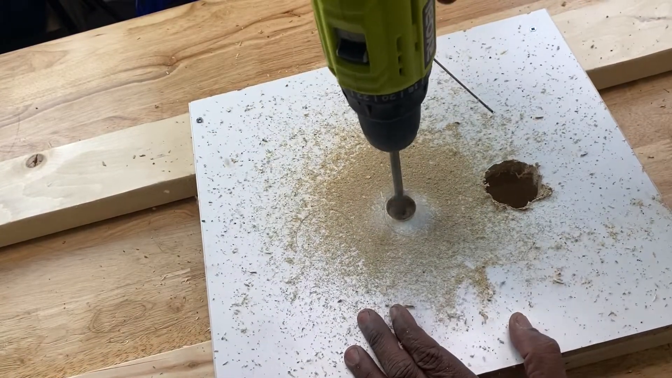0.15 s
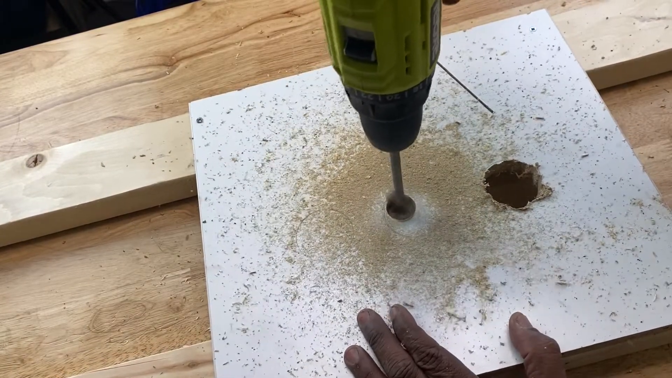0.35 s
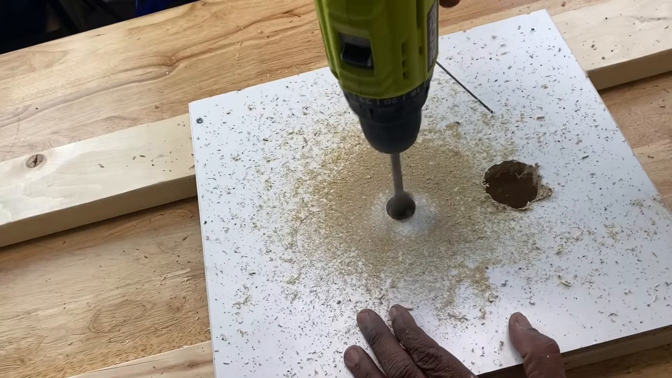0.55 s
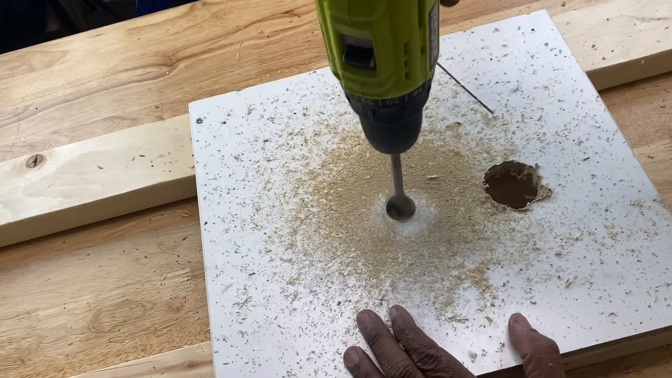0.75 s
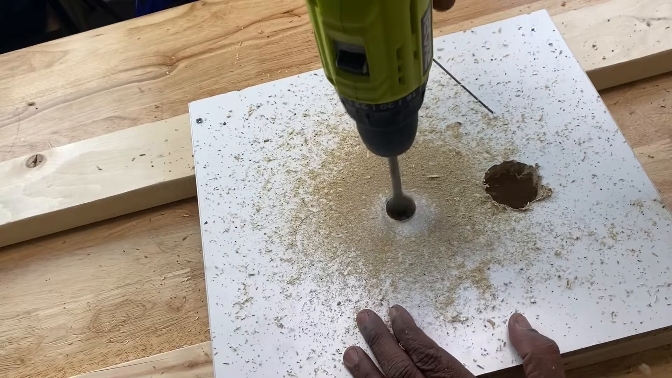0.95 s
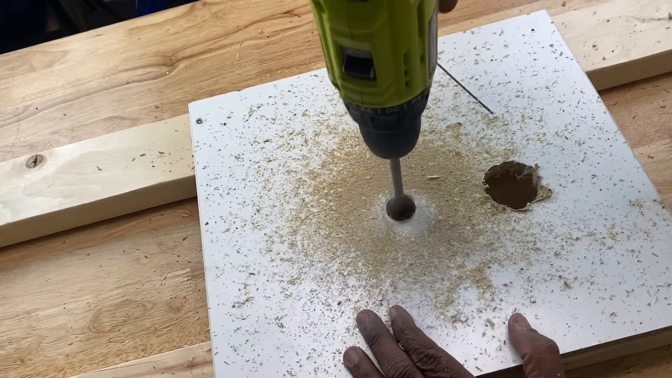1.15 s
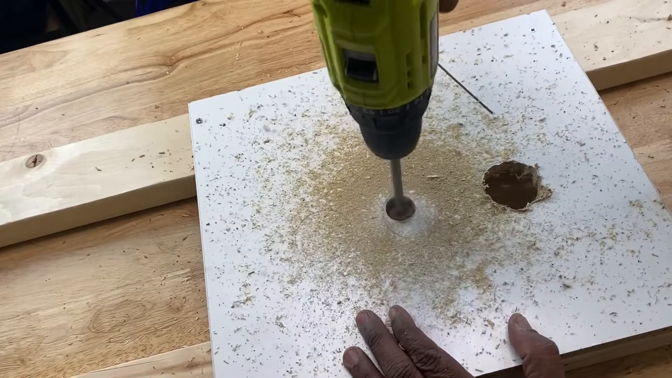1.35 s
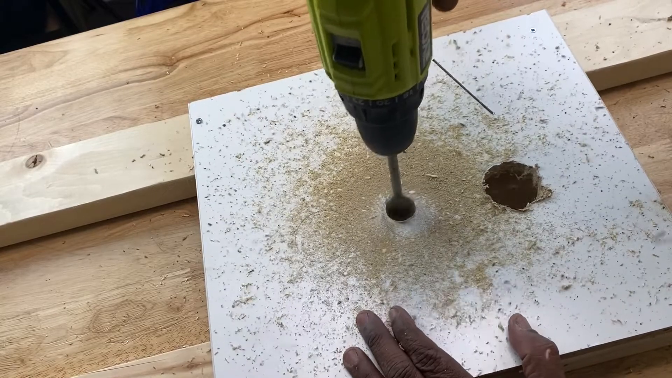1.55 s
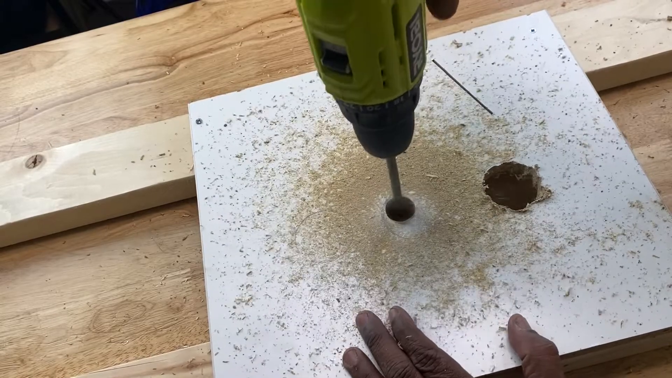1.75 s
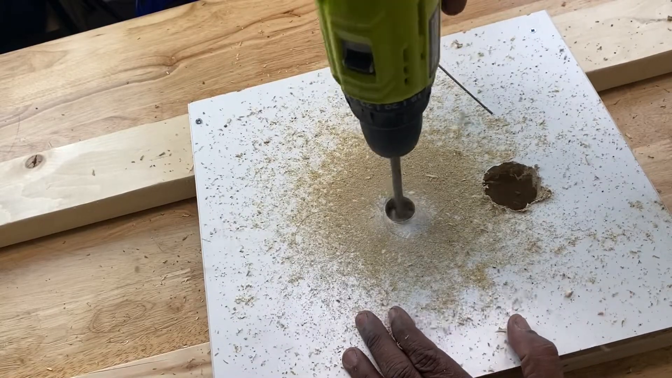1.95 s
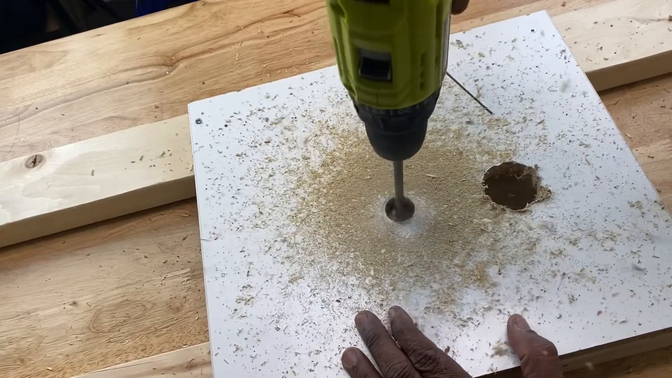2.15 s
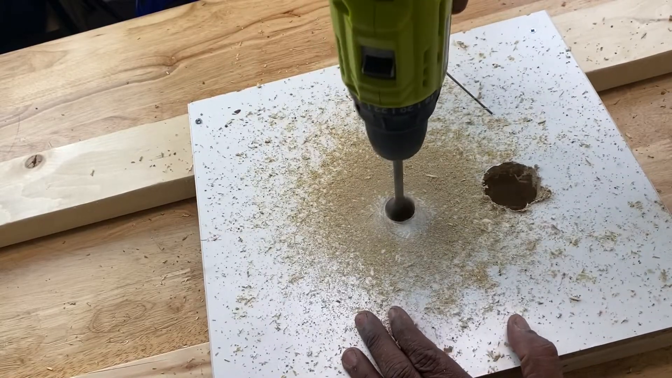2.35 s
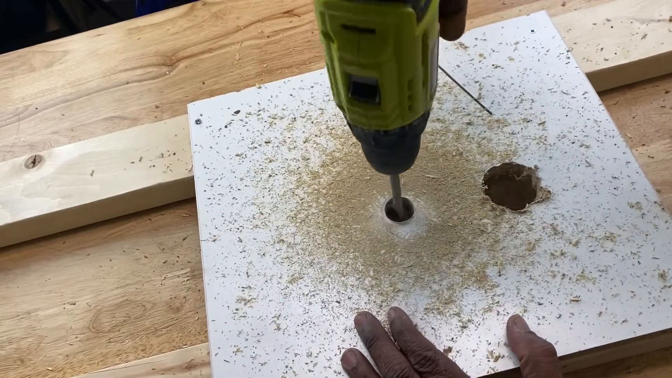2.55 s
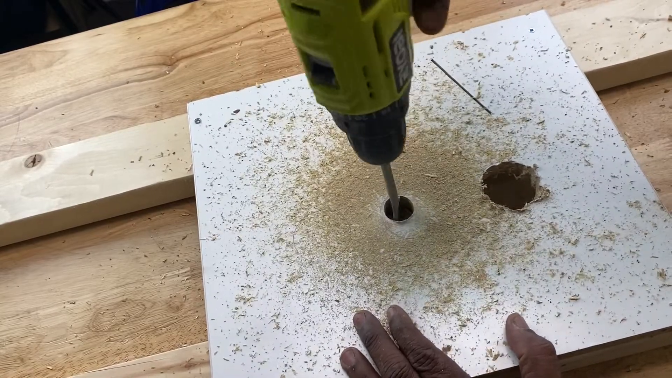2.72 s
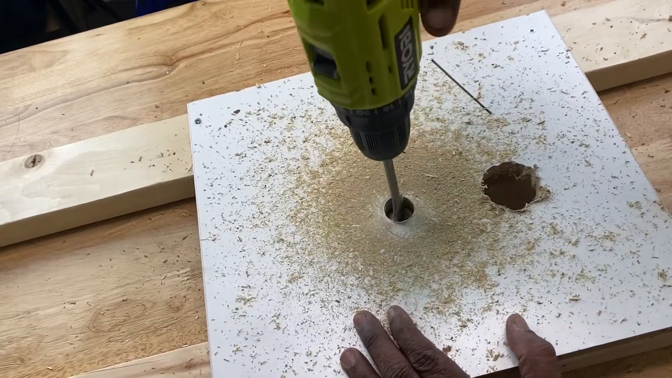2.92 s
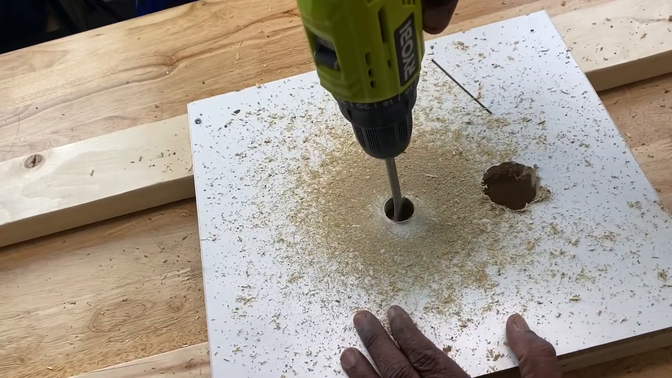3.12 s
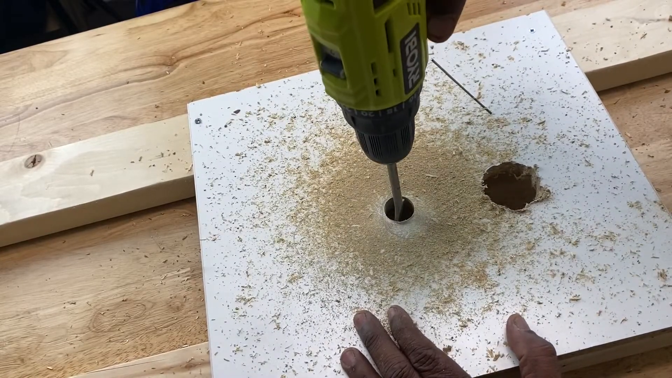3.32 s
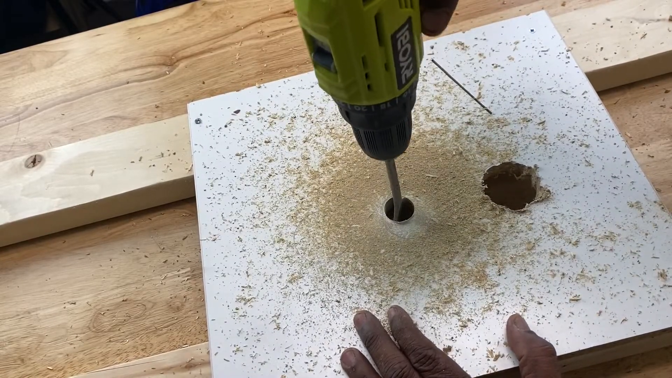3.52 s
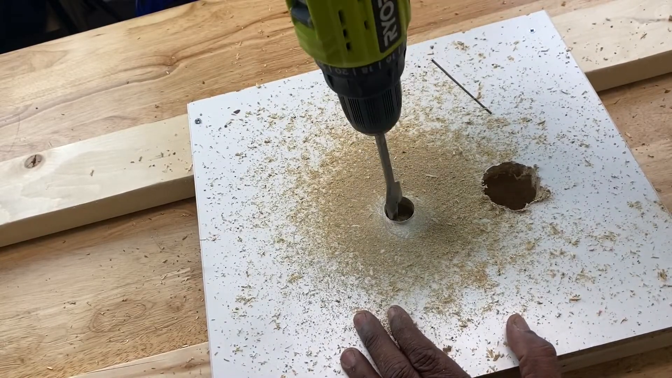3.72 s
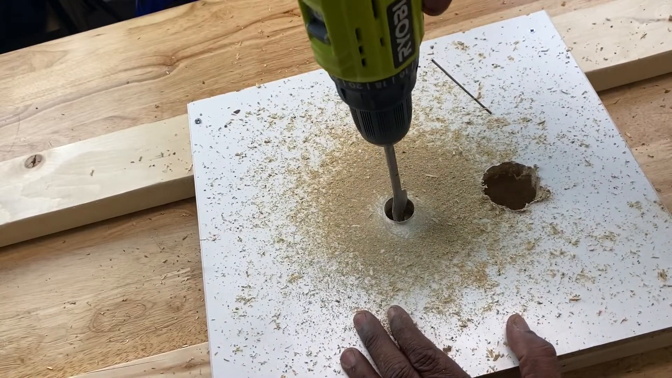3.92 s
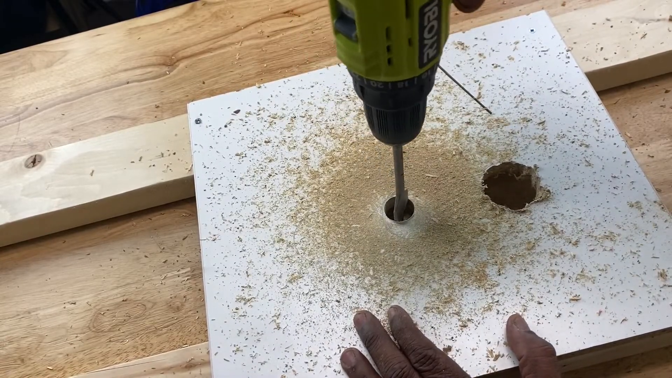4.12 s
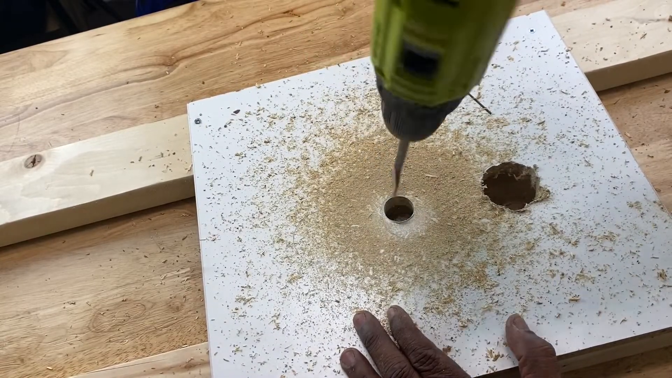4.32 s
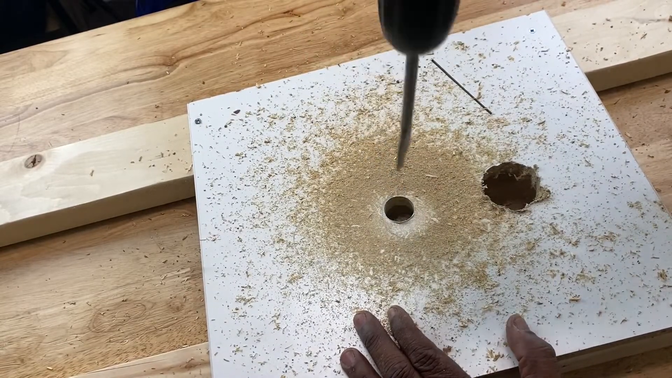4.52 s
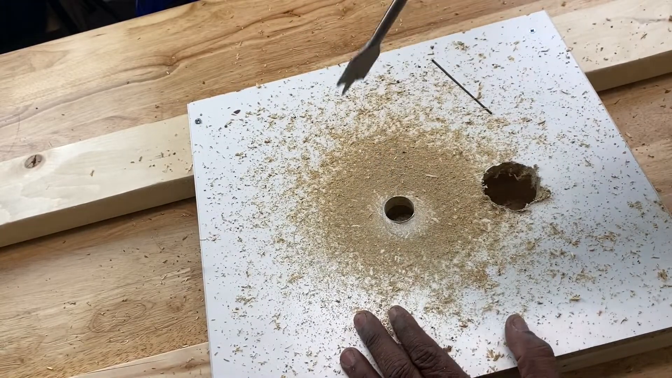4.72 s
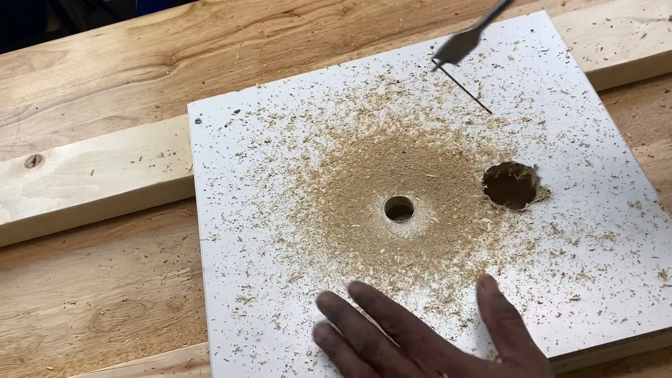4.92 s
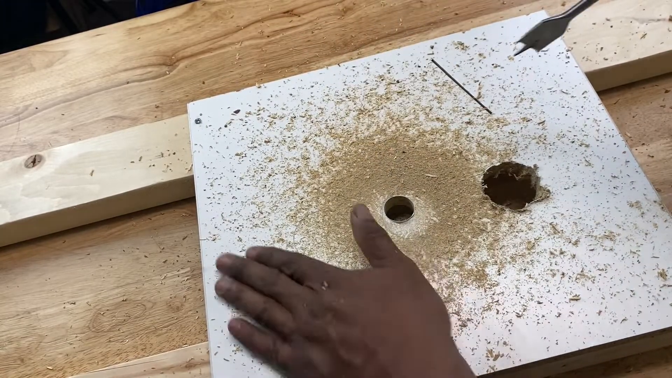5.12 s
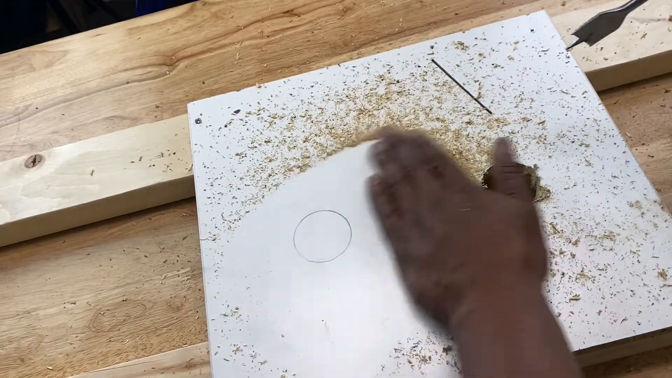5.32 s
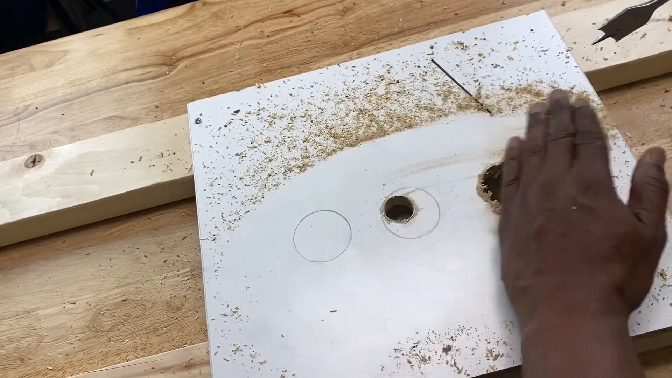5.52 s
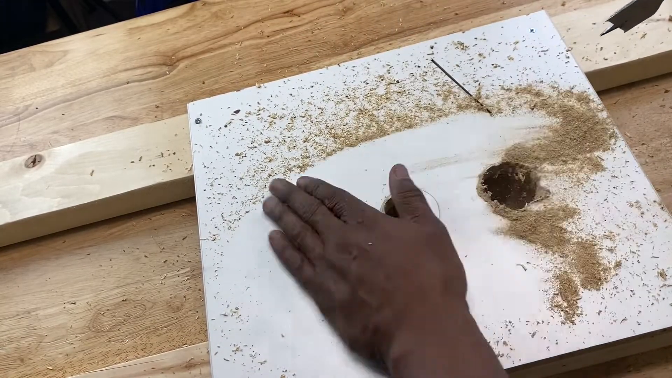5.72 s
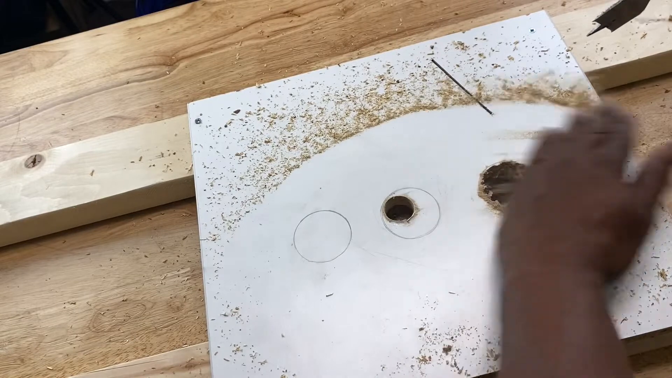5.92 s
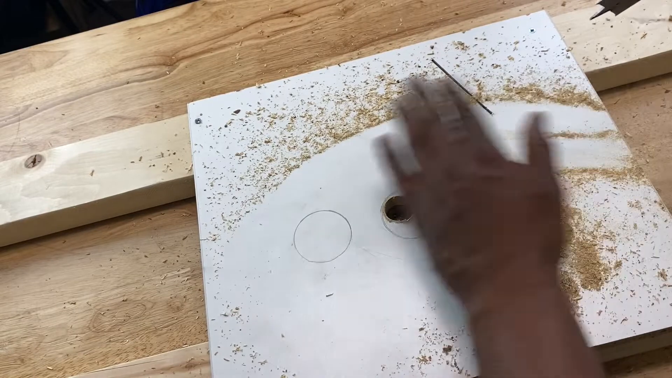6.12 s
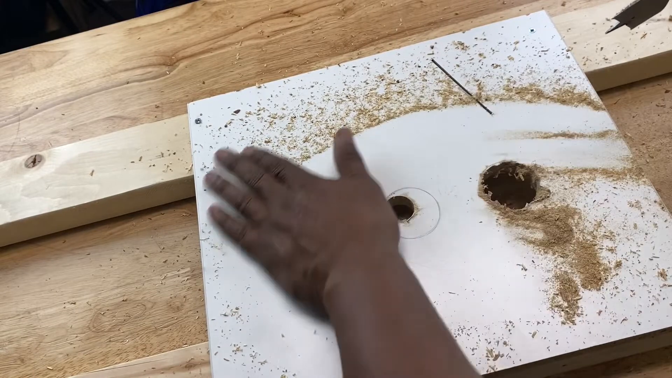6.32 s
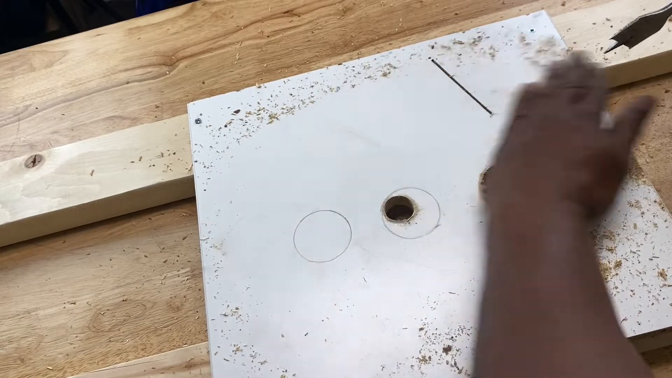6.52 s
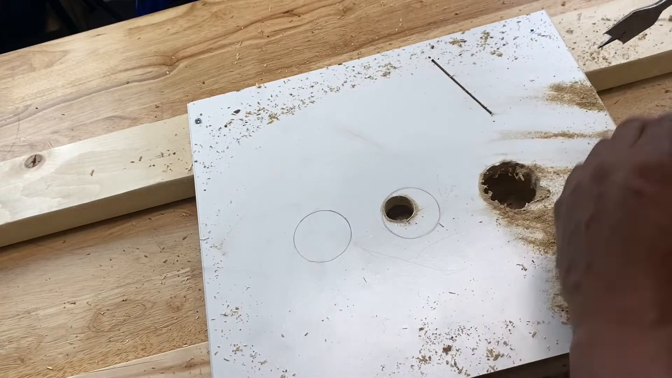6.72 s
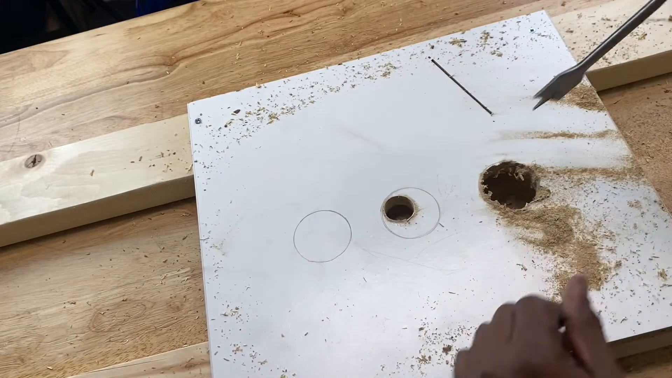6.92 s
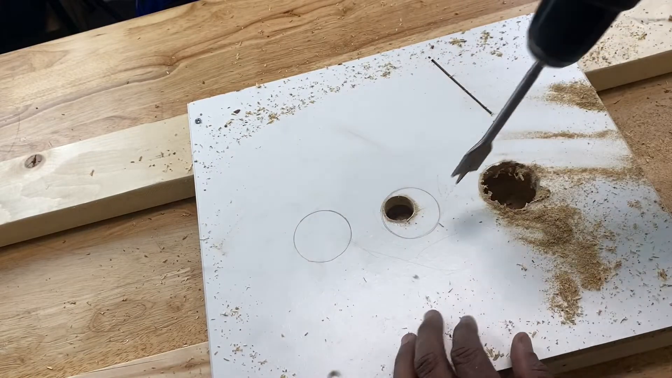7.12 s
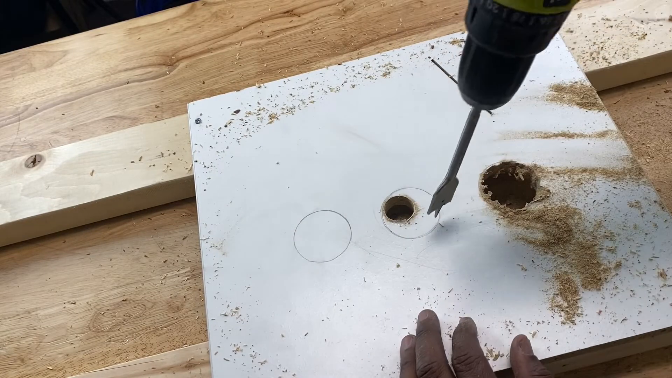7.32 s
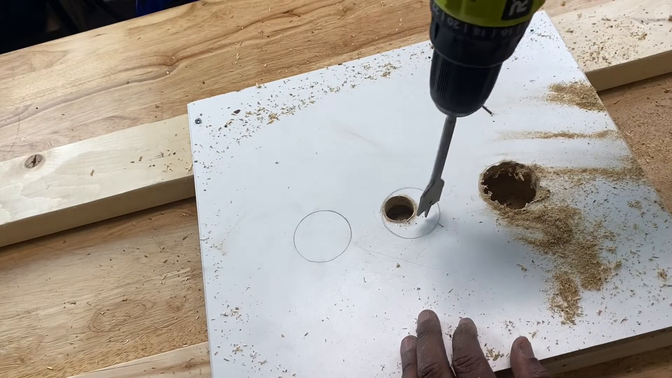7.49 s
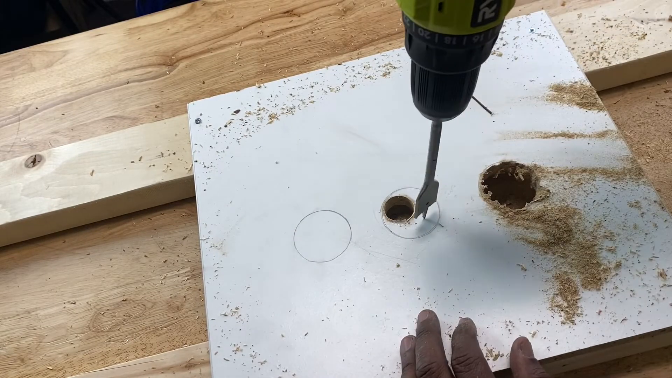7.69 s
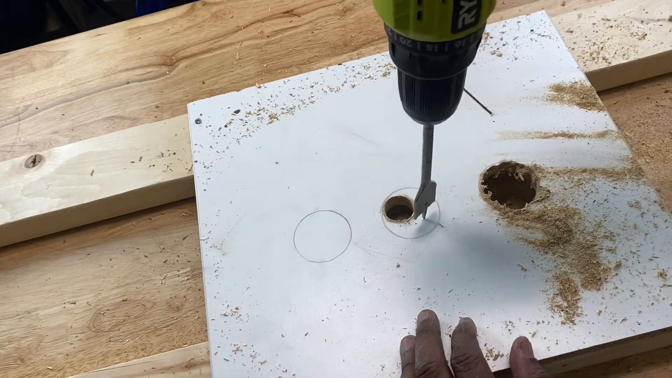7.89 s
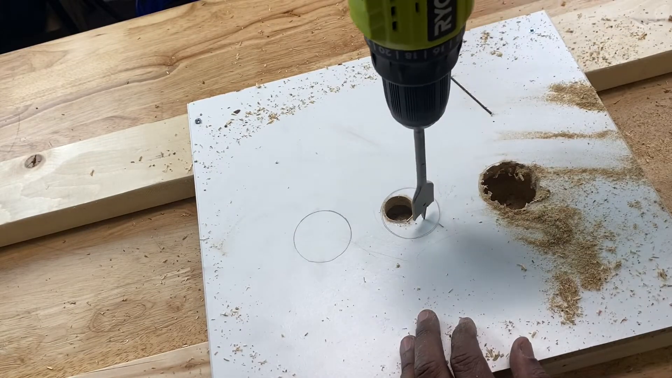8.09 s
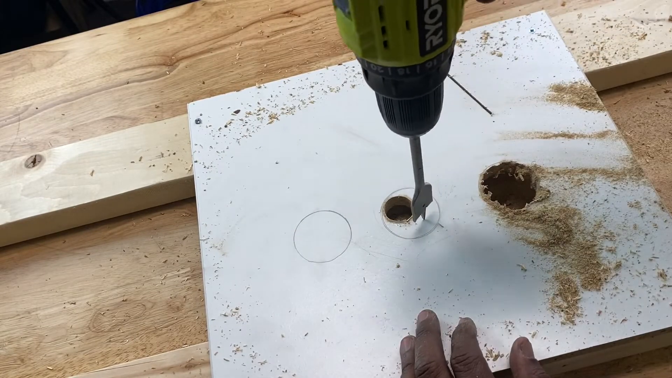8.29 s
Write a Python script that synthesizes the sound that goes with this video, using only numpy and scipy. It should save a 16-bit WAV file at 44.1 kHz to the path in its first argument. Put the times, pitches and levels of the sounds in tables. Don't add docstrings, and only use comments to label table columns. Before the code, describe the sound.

Close rough drilling into board with a sharp crack, motor stopping, bit clunking out of the hole, soft sawdust sweeps, and quiet workshop hum.

```python
import sys
import numpy as np
from scipy import signal
from scipy.fft import rfft, irfft, next_fast_len
from scipy.io import wavfile
from scipy.ndimage import uniform_filter1d

SR = 44100
rng = np.random.default_rng(int(sys.argv[2]) if len(sys.argv) > 2 else 0)


def dump_mix(stems):
    frames = np.atleast_2d(stems).T
    limited = np.clip(frames, -1, 1)
    pcm = np.round(limited * 32767).astype(np.int16)
    wavfile.write(sys.argv[1], SR, pcm)


def to_linear_factor(level_db):
    exponent = np.asarray(level_db, float) / 20
    return 10 ** exponent


N = 368235
T = np.arange(N) / SR
HZ = np.fft.rfftfreq(next_fast_len(N + SR), 1 / SR)

# time in seconds, bite in dB, wobble once a turn from 0 to 1.
BITE = [
    (0, -17, 0.03),
    (.12, -20.5, .05),
    (.33, -17.5, 0),
    (.45, -21.5, 0.24),
    (.7, -20, 0.3),
    (1.35, -20, 0.2),
    (1.95, -17.5, 0.3),
    (2.08, -21, .15),
    (2.4, -23, 0.13),
]
# time in seconds, turns ahead.
TURNS_AHEAD = [
    (0, -.3),
    (.3, -.32),
    (.55, -.44),
    (.85, -.6),
    (1.15, -.36),
    (1.4, -.36),
    (1.9, -.14),
    (2.4, -.4),
    (2.7, -.45),
]
# pitch in Hz, width in Hz, level in dB.
BOARD_MODES = [(114, 67, -13), (243, 40, -8.5), (333, 67, -7.5), (425.5, 69, 0), (479.3, 50, 1.5),
               (524.2, 16, 5), (611, 50, -5.5), (697, 65, -5.5), (988, 160, -18), (1184, 24, -10),
               (1435, 330, -25.5)]
# multiple of the turn, level in dB.
SHAKE_ORDERS = [(2, -20.5), (3, -15.5), (4, -5.5), (5, -13), (6, 2.5), (7, -11), (8, -2.5), (9, -10.5),
                (10, -3), (11, -8)]
# centre in seconds, length in seconds, multiple of the turn, level in dB.
CHATTER_SPELLS = [
    (.45, 0.6, 6, 6),
    (.15, .3, 10, 4.5),
    (0.551, .2, 9, 7),
    (1.5, .35, 4, 5),
    (1.65, .3, 8, 7),
    (1.68, .25, 10, 8.5),
    (2.17, .15, 6, 5),
]
# frequency in Hz, level in dB per Hz.
HISS_SPECTRUM = [(200, -24.5), (800, 4), (1500, 3.5), (2200, -3), (3000, 0.5), (4000, -0.5), (5300, -5.5),
                 (6500, -4.5), (8000, -6.5), (10000, -5), (12500, -11), (15500, -8)]
# pitch in Hz, width in Hz, level in dB against the hiss.
GEAR_MODES = [(2830, 29, -3.5), (3920, 40, -7.5), (5290, 660, -8)]
# time in seconds, level in dB, swell in seconds, fade in seconds, grit against board in dB.
SCRAPES_OF_BIT = [(2.69, -52, 0.026, 0.26, -8), (2.82, -52, 0.74, 0.038, -13),
                  (2.9, -69.5, 0.13, 0.46, -5.5), (3.128, -58, 0.012, 0.12, 2),
                  (3.23, -56, .3, 0.033, -12.5), (3.52, -59.5, .06, .15, -9),
                  (3.575, -46, .12, 0.13, -13.5), (3.632, -34.5, 0.018, .055, -17.5),
                  (3.74, -56, .01, 0.19, -17), (3.8, -48.5, .1, 0.075, -19), (3.84, -51, .06, 0.038, -13),
                  (4.04, -70, .03, .05, -2.5), (4.15, -71.5, .15, 0.299, 1.5),
                  (4.245, -57.5, .03, 0.09, -9), (4.285, -43, 0.061, .03, -11),
                  (4.349, -48, .03, 0.056, -7), (4.41, -55.5, 0.038, .07, -21), (4.77, -79, 0.49, 0.28, 2),
                  (7.005, -62.5, 0.043, 0.093, -3), (7.045, -64.5, 0.054, 0.044, -5.5),
                  (7.59, -65, .02, 0.094, -13), (7.69, -75, .03, 0.052, 1)]
# frequency in Hz, level in dB per Hz.
GRIT_SPECTRUM = [(500, -6.5), (900, 2.5), (1500, -3.5), (2700, -5), (3500, -8.5), (5000, -6), (8000, -30),
                 (16000, -47.5)]
# frequency in Hz, level in dB per Hz.
FIZZ_SPECTRUM = [(3000, -23.5), (5000, 5), (9000, -1.5), (16000, -6)]
# time in seconds, ring peak in dB, ring in Hz, crack in dB, low thud in dB.
KNOCKS_ON_BOARD = [(1.803, -3, 515, -30, -47), (2.659, -28, 601, -60, -54), (2.689, -46, 614, -63, -54),
                   (2.712, -43, 626, -60.5, -52), (3.123, -54, 900, -34.5, -51),
                   (3.136, -29, 480, -44, -46), (3.59, -23.5, 472, -49, -59), (3.614, -20, 518, -32, -44),
                   (3.736, -44, 360, -68, -50), (3.795, -39, 537, -52, -65),
                   (3.822, -36.5, 649, -51, -42.5), (4.022, -56, 906, -71, -74),
                   (4.035, -59, 300, -66.5, -76), (4.3231, -21.5, 695, -36.5, -41),
                   (4.403, -51, 583, -76, -48.5), (4.665, -56, 303, -69, -68.5),
                   (4.901, -78.5, 299, -68, -67.5), (5.14, -49, 347, -73, -57),
                   (5.741, -42.5, 346.5, -63, -51.5), (6.293, -43, 526, -65, -47),
                   (7.05, -59, 330, -79.5, -68), (7.583, -54, 487, -71.5, -62.5),
                   (7.599, -48, 110, -76, -59)]
# time in seconds, level in dB.
SPLINTER_BURSTS = [
    (1.803, -20.5),
    (2.659, -56),
    (3.123, -36),
    (4.322, -57.5),
    (5.136, -68.5),
    (5.739, -73),
    (6.293, -66),
]
# time in seconds, peak in dB, pitch in Hz.
TIP_TICKS = [(2.9915, -62, 6500), (3.1248, -36, 1720), (3.6157, -33.5, 1510), (3.7327, -50.5, 3840),
             (3.7777, -56.5, 2660), (3.7895, -44, 1660), (4.0346, -52, 1790), (4.2511, -47.5, 2770),
             (4.2593, -41.5, 2700), (4.321, -37.5, 5700), (4.6661, -55, 1550), (4.8241, -68, 5400),
             (4.8999, -67, 4350), (5.1407, -59, 5920), (5.7333, -57.5, 1780), (6.2909, -58, 5250),
             (6.9742, -61, 2816), (7.5998, -66, 1520)]
# start in seconds, length in seconds, level at the crest in dB, landing rub in
# dB.
STROKES = [
    (5.146, .31, -58.5, -62),
    (5.737, .2, -60, -50),
    (6.293, .255, -60, -50.5),
    (6.597, .3, -83, -71),
    (7.132, .04, -79.5, -59.5),
]
# frequency in Hz, level in dB per Hz.
DUST_SPECTRUM = [(200, -2), (600, 3), (1200, 0), (2500, -1.5), (4000, -2.5), (5500, -1), (7500, -2.5),
                 (10000, -1), (13000, -7.5), (15500, -0.5)]
# frequency in Hz, level in dB per Hz.
HUM_SPECTRUM = [(15, -26.5), (25, -12), (48, 0.5), (149, -5), (208, -14), (249, -9), (475, -27.5),
                (776, -25), (1010, -27.5), (2180, -42.5), (2610, -48.5), (4990, -52), (12000, -64.5),
                (15600, -86), (22000, -120)]
# time in seconds, level in dB.
HUM_LEVEL = [
    (3, 3),
    (4.6, -0.6),
    (7.435, 0.5),
    (7.445, -11),
    (7.6, -6),
    (8.35, -7.5),
]
# frequency in Hz, share of power.
DIRECT_SHARE = [(100, .99), (300, .95), (600, .88), (1000, .7), (1400, .35), (1800, .7), (3000, .5),
                (5500, .45), (6600, .75), (7800, 1.)]
# frequency in Hz, left over right in dB.
LEFT_OVER_RIGHT = [(60, 1), (110, -0.5), (200, 2.5), (380, -6.5), (700, -2.5), (1290, -1.5), (2380, -3.5),
                   (4400, -6.5), (8120, -2), (15000, 0.0)]
# frequency in Hz, left lag in radians.
LEFT_LAG_RAD = [(100, 0), (500, .25), (1000, .5), (1500, 0), (2500, 1.4), (3000, 2.), (3600, 1.4),
                (3900, .2), (5000, .5), (6600, 0)]


def drill():
    turns_per_s, through_s, stop_s, coast_s = 21.7, 2.424, 2.62, 0.13
    bite_db, wobble = columns(BITE)
    freed_db = -16.5 * ramp(through_s, 0.12)
    stop_db = -37.5 * ramp(stop_s, coast_s)
    cut_db = bite_db + freed_db + stop_db + 1

    shake_db = -30.5 - 0.18 * (bite_db + 17) - 6.5 * np.maximum(T - 1.7, 0)
    shake_db += 0.6 * freed_db + stop_db + 2.5 * drift(7.4)
    hiss_db = -25.5 + 0.31 * freed_db + 1.3 * stop_db + 0.21 * drift(12)
    on = 1 - ramp(stop_s + coast_s, 0.012)

    ahead, = columns(TURNS_AHEAD)
    turns = 10 + turns_per_s * T + uniform_filter1d(ahead, size=4000) + 0.012 * drift(8)
    turn_rad = 2 * np.pi * turns
    throb = np.cos(turn_rad) + 0.54 * np.cos(2 * turn_rad + 0.94)
    bite = np.exp(wobble * throb + 0.073 * drift(120))

    tears = grains(1500, spread_db=2)
    same = (2000 * (turns % 1 + turns // 5)).astype(int)
    torn = evened(bite) * (tears[::-1] + 1.3 * tears[same])
    chips = evened(filtered(torn, modes(BOARD_MODES)) * bite ** 0.4)

    shake = np.zeros(N)
    for multiple, db in SHAKE_ORDERS:
        order_db = db + chatter_db(multiple) + 2.2 * drift(5)
        shake += to_linear_factor(order_db) * np.cos(multiple * turn_rad + 7 * rng.random())

    air = rng.standard_normal(N) + 0.3 * evened(grains(1500, spread_db=5.5))
    casing = to_linear_factor(read(HISS_SPECTRUM, HZ)) + 2.1 * modes(GEAR_MODES)
    hiss = evened(filtered(air, casing) * bite ** 0.68)
    return on * (to_linear_factor(cut_db) * chips + to_linear_factor(shake_db) * evened(shake) + to_linear_factor(hiss_db) * hiss)


def chatter_db(multiple):
    return sum(db * np.exp(-(2 * (T - s) / length_s) ** 2)
               for s, length_s, order, db in CHATTER_SPELLS if order == multiple)


def rubbing():
    slips = grains(890, spread_db=3.5)
    board = evened(filtered(slips, modes(BOARD_MODES[2:])))
    bench = evened(filtered(slips, modes(BOARD_MODES[:2])))
    grit = evened(filtered(grains(5000, spread_db=4.5), to_linear_factor(read(GRIT_SPECTRUM, HZ))))
    fizz = evened(filtered(grains(6000, spread_db=2), to_linear_factor(read(FIZZ_SPECTRUM, HZ))))

    power = np.zeros((3, N))
    for s, db, rise_s, fall_s, grit_db in SCRAPES_OF_BIT:
        board_db = db + swell_db(s, rise_s, fall_s)
        bench_db = -55 + 0.7 * (db + 49.5) + swell_db(s, rise_s, 1.37 * fall_s)
        power += to_linear_factor([board_db, board_db + grit_db, bench_db]) ** 2
    on_board, on_grit, on_bench = np.sqrt(power)
    on_fizz = to_linear_factor(-68) * (on_grit / to_linear_factor(-62.5)) ** 1.15
    return on_board * board + to_linear_factor(3.5) * on_grit * grit + on_fizz * fizz + on_bench * bench


def knocks():
    out, t = np.zeros(N), T[:6000]
    chance = rng.standard_normal((len(KNOCKS_ON_BOARD) + len(SPLINTER_BURSTS), 2, len(t)))
    cracks = signal.lfilter(*signal.butter(2, [900, 3300], "band", fs=SR), chance[:, 0])
    brights = signal.lfilter(*signal.butter(2, 7000, "high", fs=SR), chance[:, 1])
    snap = t / 0.00087 * np.exp(1 - t / 0.0011) + to_linear_factor(-10 - 60 * t / 0.15)
    thud = to_linear_factor(-60 * t / 0.14) * sine(128, t) + 0.63 * to_linear_factor(-60 * t / 0.078) * sine(205, t)
    thud *= 1 - np.exp(-t / 0.0086)
    ring_shape = np.exp(-(t / 0.0084) ** 1.6) * (1 - np.exp(-t / 0.0009))

    for (s, db, hz, crack_db, thud_db), crack, bright in zip(KNOCKS_ON_BOARD, cracks, brights):
        ring = sine(hz, t) + 0.5 * sine(1.27 * hz, t) + 0.18 * sine(2.3 * hz, t)
        crackle = snap * (crack + to_linear_factor(-22.5) * bright)
        add(out, s, to_linear_factor(db - 1.5) * ring_shape * ring)
        add(out, s, to_linear_factor(crack_db + 3.5) * crackle + to_linear_factor(thud_db + 6.5) * thud)
    for (s, db), bright in zip(SPLINTER_BURSTS, brights[len(KNOCKS_ON_BOARD):]):
        add(out, s, to_linear_factor(db + 3) * snap * bright)
    return out


def ticks():
    out, t = np.zeros(N), T[:400]
    for s, db, hz in TIP_TICKS:
        cycles = sine(hz, t) + 0.28 * sine(1.67 * hz, t) + 0.21 * rng.standard_normal(len(t))
        add(out, s - 30 / SR, to_linear_factor(db - 60 * t / 0.008) * cycles)
    return out


def hand():
    land_s, lift_s, rub_fade_s = 0.013, 0.035, 0.1383
    crest = 0.67
    dust = evened(filtered(grains(12000, spread_db=2), to_linear_factor(read(DUST_SPECTRUM, HZ))))
    dust *= to_linear_factor(1.14 * drift(40))
    rub = evened(filtered(rng.standard_normal(N), modes([(92, 60, 5.5), (176, 100, -5)])))
    out = np.zeros(N)
    for s, length_s, db, land_db in STROKES:
        gather_db = -6.5 * abs(ramp(s, length_s) / crest - 1)
        drag = to_linear_factor(db + swell_db(s, land_s, lift_s, length_s) + gather_db)
        landing = to_linear_factor(land_db + swell_db(s, land_s, rub_fade_s))
        out += to_linear_factor(6.5) * drag * dust + (to_linear_factor(-10) * drag + landing) * rub
    return out


def workshop():
    both, left, right = rfft(rng.standard_normal((3, 2 * len(HZ) - 2)))
    share = read([(60, 1), (300, 0.7), (1000, 0.1)], HZ)
    sides = np.sqrt(share) * both + np.sqrt(1 - share) * np.array([left, right])
    hum = to_linear_factor(read(HUM_SPECTRUM, HZ)) * sides
    low = 1 / (1 + (HZ / 380) ** 6)
    bass = evened(irfft(hum * low)[:, :N])
    upper = evened(irfft(hum * (1 - low))[:, :N])
    gain_db, = columns(HUM_LEVEL)
    bass_db = -65 + gain_db + 1.8 * drift(3.4)
    upper_db = -74.5 + gain_db + 0.44 * drift(3)
    return bass * to_linear_factor(bass_db) + upper * to_linear_factor(upper_db)


def heard(steady, sharp):
    late = np.pad(steady + 0.4 * sharp, (230, 0))[:N]
    z = signal.stft(late, nperseg=512, noverlap=384)[2]
    paths = uniform_filter1d(rng.standard_normal((2, 2) + z.shape), size=12, axis=3)
    turned = z * np.exp(1j * np.arctan2(*paths))
    scattered = signal.istft(turned, nperseg=512, noverlap=384)[1][:, :N]

    direct = read(DIRECT_SHARE, HZ)
    gap_rad = np.pi * np.maximum(HZ - 6620, 0) / 4600 - read(LEFT_LAG_RAD, HZ) / 2
    balance = to_linear_factor(np.outer([0.5, -0.5], read(LEFT_OVER_RIGHT, HZ)))
    ports = balance * np.exp(1j * np.outer([1, -1], gap_rad))
    near = filtered(steady, np.sqrt(direct)) + sharp
    return filtered(near, ports) + filtered(1.633 * scattered, ports * np.sqrt(1 - direct))


def evened(x):
    return x / np.sqrt(np.mean(x ** 2) + 1e-20)


def sine(hz, t):
    return np.sin(2 * np.pi * hz * t)


def read(points, hz):
    f, value = np.transpose(points)
    return np.interp(np.log(hz + 1), np.log(f + 1), value)


def columns(rows):
    s, *values = np.transpose(rows)
    return [np.interp(T, s, v) for v in values]


def filtered(x, response):
    size = 2 * len(HZ) - 2
    return irfft(rfft(x, size) * response, size)[..., :N]


def modes(table):
    total = 0
    for k, (hz, width_hz, db) in enumerate(table):
        damping = 1j * HZ * width_hz
        total = total + (-1) ** k * to_linear_factor(db) * damping / (hz * hz - HZ ** 2 + damping)
    return total


def grains(per_s, spread_db):
    size = to_linear_factor(spread_db * np.minimum(rng.exponential(1, N), 5)) * rng.choice([-1, 1], N)
    return size * (rng.random(N) < per_s / SR)


def drift(hz):
    noise = rng.standard_normal(N // 64 + 2000)
    coarse = signal.lfilter(*signal.butter(2, hz * 128 / SR), noise)[1990:]
    return np.interp(T, np.arange(len(coarse)) * 64 / SR, evened(coarse))


def ramp(s, length_s):
    return np.clip((T - s) / length_s, 0, 1)


def swell_db(s, rise_s, fall_s, hold_s=0):
    return -20 * (np.maximum(s - T, 0) / rise_s + np.maximum(T - s - hold_s, 0) / fall_s)


def add(out, s, sound):
    part = out[round(s * SR):][:len(sound)]
    part += sound[:len(part)]


def scene():
    return heard(drill() + rubbing() + hand(), knocks() + ticks()) + workshop()


def band_limit(x):
    return signal.sosfilt(signal.butter(12, 15980, fs=SR, output="sos"), x)


def record(dry):
    limited = filtered(dry, 1 / (1 + (HZ / 15900) ** 150))
    return band_limit(limited)


dry = scene()
out = record(dry)
dump_mix(out)
```